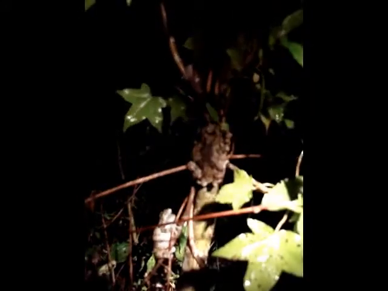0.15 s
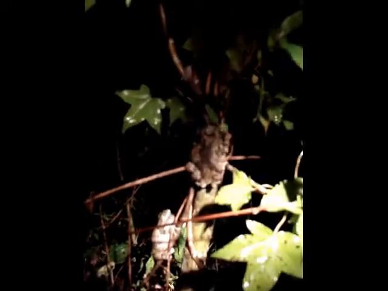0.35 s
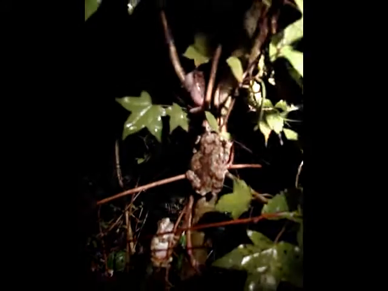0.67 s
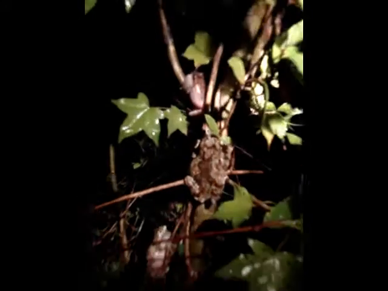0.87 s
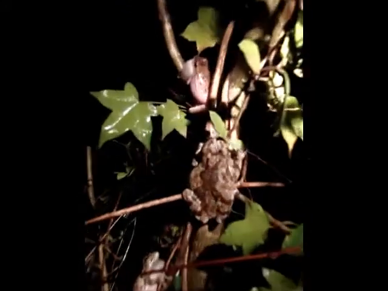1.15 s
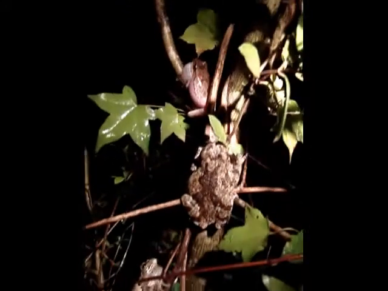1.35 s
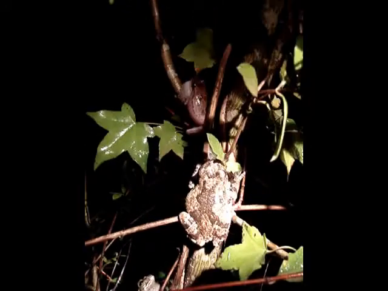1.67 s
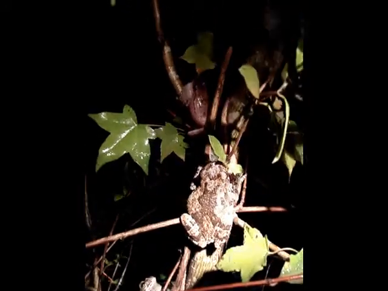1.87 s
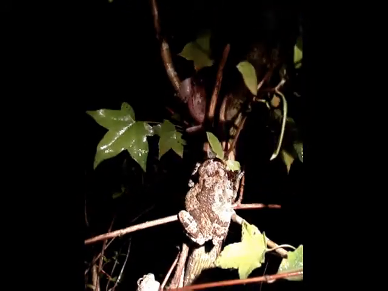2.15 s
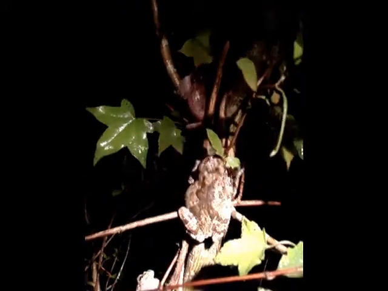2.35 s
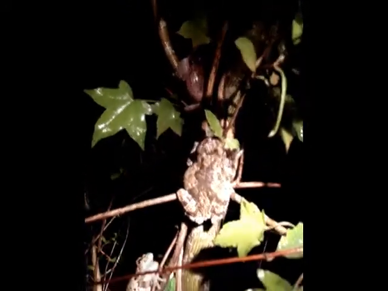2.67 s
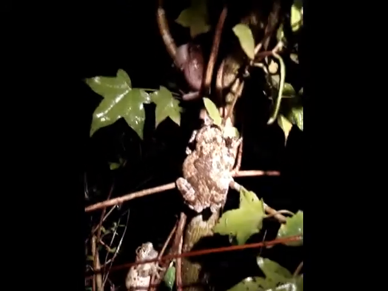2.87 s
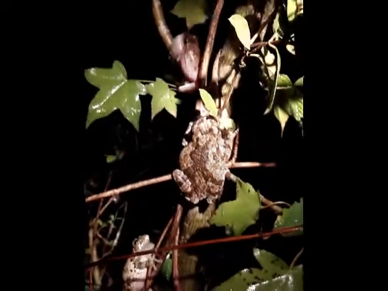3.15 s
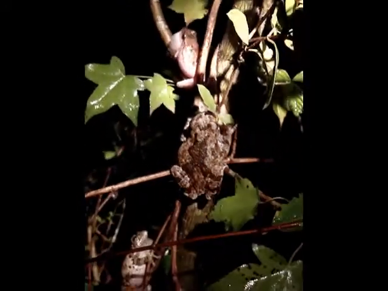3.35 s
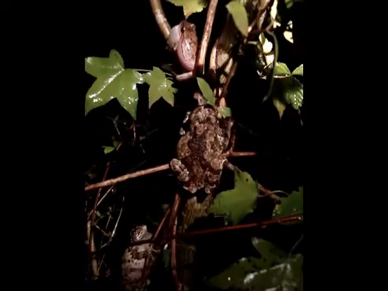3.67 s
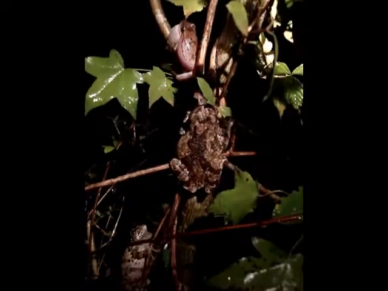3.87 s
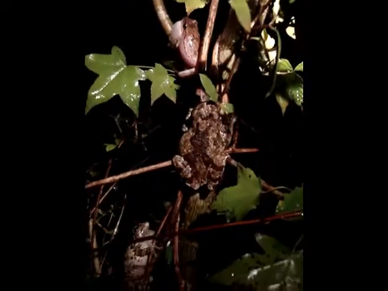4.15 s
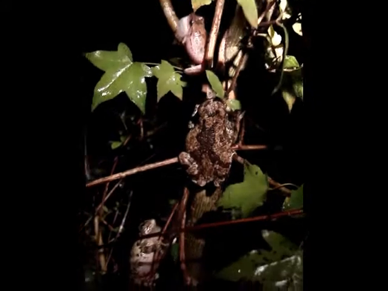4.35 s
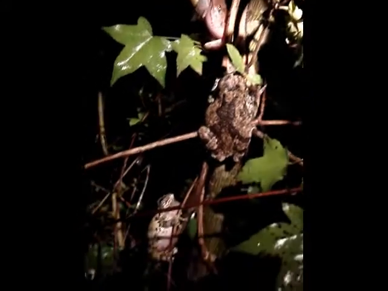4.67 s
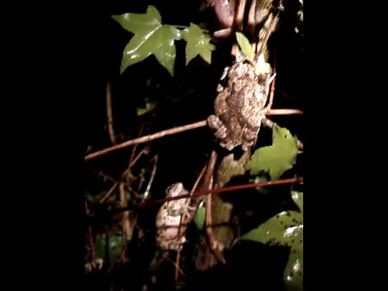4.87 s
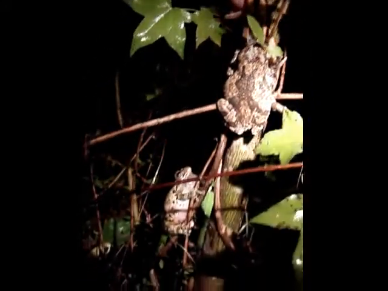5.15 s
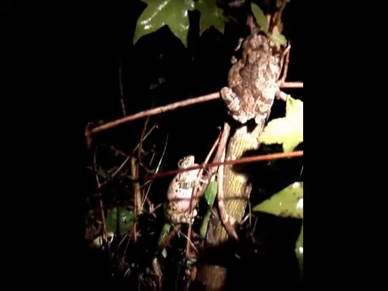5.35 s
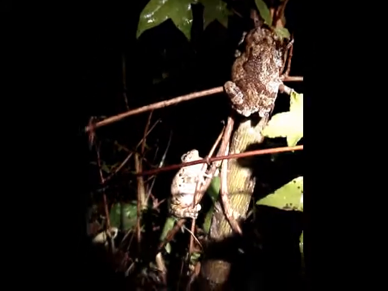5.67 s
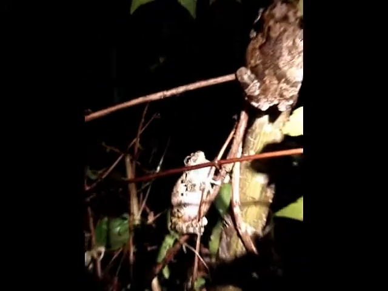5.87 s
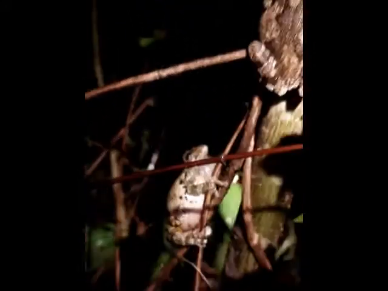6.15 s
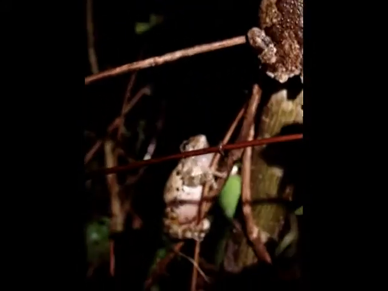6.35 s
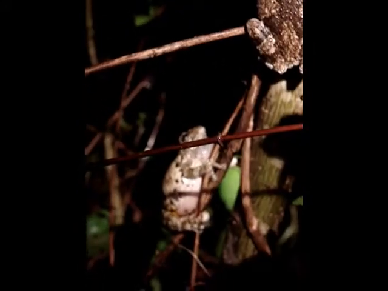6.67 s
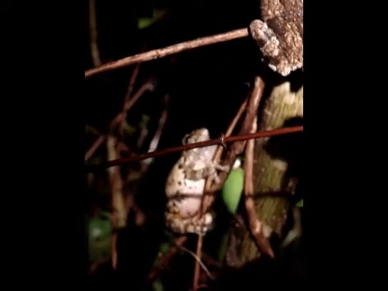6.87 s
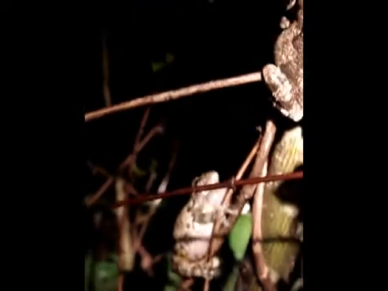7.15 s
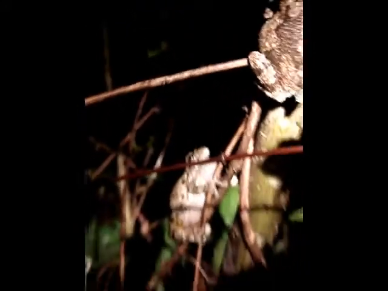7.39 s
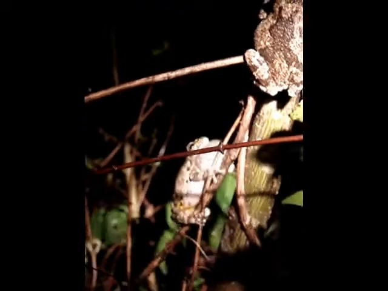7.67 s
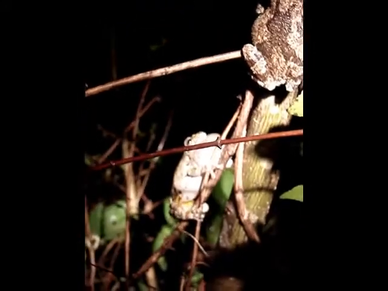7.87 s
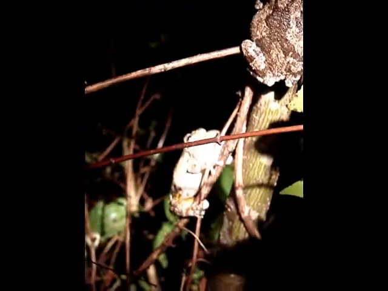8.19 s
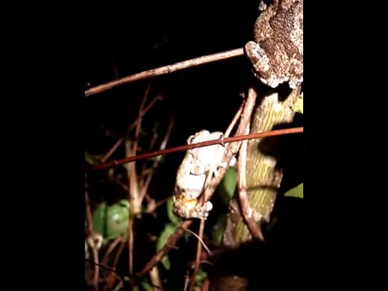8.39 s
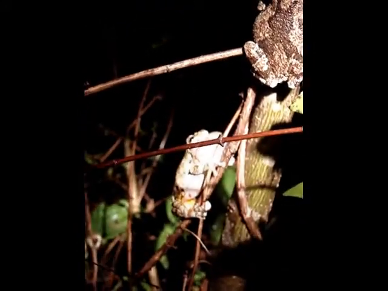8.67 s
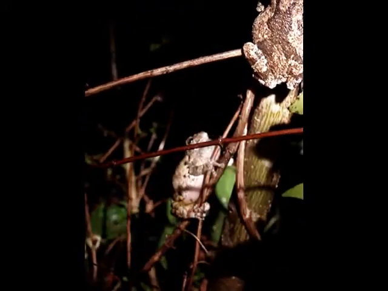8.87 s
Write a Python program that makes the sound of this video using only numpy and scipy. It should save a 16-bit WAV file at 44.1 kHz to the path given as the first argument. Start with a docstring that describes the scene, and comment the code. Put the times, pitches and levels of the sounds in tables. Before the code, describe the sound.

At a night pond edge, two treefrogs very close by trade fast bursts of four or five hard clicks, about six bursts a second each, with a softer, lower third frog between. Another species adds buzzy one-second trills, strongest near one to two seconds and again near eight, when the clicking thins. Behind lie a blurred frog chorus and thin insect shimmer. A small microphone, thin in bass, crunches on the peaks.

```python
"""Quick click bursts from treefrogs ring out first: two close and one softer, by turns and overlapping.
Frogs of a second kind lay long buzzy trills over them, made of pulses that each sweep upward in pitch.
Clicks are short, fading sets of harmonics; trill pulses are harmonic tones that swell and stop.
Behind this pond edge at night are a far chorus of both kinds, a soft low caller, insects made of
chopped noise and a steady noise blur. A small microphone overloads on the peaks."""
import sys
import numpy as np
from scipy import signal
from scipy.fft import rfft, irfft
from scipy.io import wavfile
from scipy.ndimage import uniform_filter1d, minimum_filter1d

SR = 44100
rng = np.random.default_rng(int(sys.argv[2]) if len(sys.argv) > 2 else 0)


def wrap_up_sound(samples):
    """Save the sound to the file named by the first command line argument, as 16-bit audio."""
    columns = np.atleast_2d(samples).T
    # keep every value between -1 and 1, then stretch to whole-number steps
    tamed = np.clip(columns, -1, 1)
    steps = np.round(tamed * 32767).astype(np.int16)
    wavfile.write(sys.argv[1], SR, steps)


N = 397782

# Click bursts: start_s, clicks (count), middle_click_level_db, frog (name)
CLICK_BURSTS = [(.0065, 3, -22, "low"), (.0707, 4, -4, "near"), (.1909, 4, -22, "low"),
                (.2618, 4, -10, "reply"), (.3164, 5, -6, "near"), (.3821, 4, -23, "low"),
                (.3914, 4, -13, "reply"), (.4726, 4, -7, "near"), (.5022, 4, -25, "low"),
                (.5714, 4, -9.5, "reply"), (.6123, 4, -25, "low"), (.6559, 5, -6.5, "near"),
                (.709, 2, -11, "reply"), (.7131, 4, -22, "low"), (.8047, 4, -8, "near"),
                (.8875, 4, -13, "reply"), (.9571, 4, -26, "low"), (.9634, 5, -7.5, "near"),
                (1.0475, 3, -12.5, "reply"), (1.1287, 5, -8.5, "near"), (1.2288, 3, -13, "reply"),
                (1.2917, 4, -30, "low"), (1.2965, 5, -10.5, "near"), (1.402, 3, -17, "reply"),
                (1.4879, 4, -9.5, "near"), (1.5675, 3, -16, "reply"), (1.679, 4, -9, "near"),
                (1.7579, 4, -16, "reply"), (1.8372, 5, -9, "near"), (1.9304, 3, -17, "reply"),
                (2.0165, 5, -9.5, "near"), (2.069, 3, -31, "low"), (2.113, 4, -16, "reply"),
                (2.1945, 4, -7, "near"), (2.2776, 4, -14, "reply"), (2.3025, 4, -30, "low"),
                (2.3581, 5, -7, "near"), (2.4665, 3, -29, "low"), (2.5129, 4, -5.4, "near"),
                (2.5669, 3, -21, "low"), (2.6205, 4, -6, "near"), (2.6886, 4, -27, "low"),
                (2.7615, 5, -6, "near"), (2.8646, 4, -5, "near"), (2.9575, 5, -6.5, "near"),
                (3.0566, 5, -6, "near"), (3.1583, 5, -5, "near"), (3.2463, 4, -23, "low"),
                (3.2545, 4, -14.5, "reply"), (3.3303, 5, -5, "near"), (3.4271, 4, -14, "reply"),
                (3.4529, 4, -26, "low"), (3.5054, 5, -6, "near"), (3.6111, 4, -12.5, "reply"),
                (3.6254, 4, -25, "low"), (3.6807, 5, -6, "near"), (3.7936, 4, -21, "low"),
                (3.8045, 3, -12, "reply"), (3.836, 5, -5.5, "near"), (3.8971, 3, -13, "reply"),
                (3.9163, 4, -28, "low"), (3.9737, 5, -6.5, "near"), (4.0732, 4, -12.5, "reply"),
                (4.0897, 4, -23, "low"), (4.1531, 5, -6, "near"), (4.2453, 4, -15, "reply"),
                (4.2792, 4, -29, "low"), (4.3308, 5, -5, "near"), (4.4088, 4, -22, "low"),
                (4.4133, 4, -13, "reply"), (4.4859, 5, -5, "near"), (4.5609, 4, -26, "low"),
                (4.5944, 3, -10.5, "reply"), (4.6673, 5, -6, "near"), (4.7619, 4, -12.5, "reply"),
                (4.8254, 4, -26, "low"), (4.844, 5, -7.5, "near"), (4.9035, 4, -11.5, "reply"),
                (5.0279, 4, -7, "near"), (5.105, 3, -9.5, "reply"), (5.1734, 5, -4.5, "near"),
                (5.2263, 4, -30, "low"), (5.2666, 4, -11.5, "reply"), (5.3456, 5, -6.5, "near"),
                (5.3973, 4, -30, "low"), (5.4405, 4, -11.5, "reply"), (5.5192, 5, -5.5, "near"),
                (5.6052, 4, -14, "reply"), (5.6839, 5, -6, "near"), (5.7684, 4, -14, "reply"),
                (5.7858, 4, -29, "low"), (5.8505, 5, -6, "near"), (5.936, 4, -13, "reply"),
                (5.9399, 4, -26, "low"), (6.0179, 5, -6, "near"), (6.1105, 4, -12.5, "reply"),
                (6.1224, 4, -22, "low"), (6.199, 5, -6, "near"), (6.2228, 4, -33, "low"),
                (6.272, 4, -11, "reply"), (6.3282, 4, -25, "low"), (6.3876, 5, -7, "near"),
                (6.4563, 4, -24, "low"), (6.5349, 4, -13, "reply"), (6.5741, 4, -22, "low"),
                (6.6165, 5, -6, "near"), (6.6742, 3, -11, "reply"), (6.7038, 4, -26, "low"),
                (6.7457, 5, -6.5, "near"), (6.8215, 4, -10.5, "reply"), (6.9, 5, -7.5, "near"),
                (6.9846, 4, -12, "reply"), (7.0637, 5, -6.5, "near"), (7.1187, 4, -28, "low"),
                (7.149, 4, -13, "reply"), (7.2281, 5, -6.5, "near"), (7.3009, 3, -25, "low"),
                (7.3264, 4, -11, "reply"), (7.4086, 4, -6, "near"), (7.4831, 4, -27, "low"),
                (7.5071, 3, -9.5, "reply"), (7.5859, 4, -5, "near"), (7.6656, 4, -12.5, "reply"),
                (7.6815, 4, -25, "low"), (7.7542, 4, -6, "near"), (7.8152, 3, -22, "low"),
                (7.8373, 5, -19, "reply"), (7.931, 4, -10, "near"), (8.0031, 4, -17, "reply"),
                (8.1643, 4, -17, "reply"), (8.2781, 3, -18, "reply"), (8.361, 5, -18.5, "reply"),
                (8.3617, 4, -31, "low"), (8.4727, 5, -12, "near"), (8.5649, 4, -32, "low"),
                (8.5705, 3, -15.5, "reply"), (8.6606, 4, -18.5, "reply"), (8.782, 5, -20, "reply"),
                (8.9296, 4, -17, "reply")]
# The three clicking frogs, by name: pitch_hz, fundamental_db (added to its level in the click harmonics),
# first_click_db, last_click_db (both against the middle clicks)
CLICKING_FROGS = {"near": (1971.5, -3.5, 0, -4.5), "reply": (1962.5, 2, -1.5, -0.5),
                  "low": (1772, 9.5, -5.5, -3.5)}
# Harmonics of a click, from the fundamental up: level_db, fade_60_db_s
CLICK_OVERTONES = [(-2.5, 0.015), (-1.5, 0.011), (-23.5, 0.0098), (-45, 0.034), (-42, 0.05)]
# Looser folds of the vocal sac ring beside the harmonics: pitch_ratio (times the pitch), level_db, fade_60_db_s
LOOSE_FOLDS = [(2.15, -4.5, 0.0075), (1.84, -1.5, 0.0067), (1.09, -7, 0.01)]
# Trills: first_pulse_s, middle_pulse_s, last_pulse_s, pulses (count), early_db, late_db, strongest_hz
TRILL_CALLS = [(.0224, .5214, 1.05, 49, -7, -4.5, 2630), (.0233, .1611, .3012, 13, -8, -10, 2600),
               (.9703, 1.5031, 2.0566, 49, -1, -1.5, 2700), (2.084, 2.5456, 2.9947, 43, -12, -14, 2460),
               (3.0176, 3.4822, 3.9844, 45, -15, -18, 2370), (4.0186, 4.4438, 4.849, 39, -17, -9, 2540),
               (4.2037, 4.7442, 5.3023, 53, -12, -16, 2560), (4.5569, 4.9536, 5.3632, 37, -14, -12, 2570),
               (5.32, 5.7272, 6.1568, 41, -12, -14, 2480), (5.9922, 6.3087, 6.6376, 29, -9, -4, 2610),
               (6.6591, 7.1325, 7.636, 46, -8, -7, 2650), (7.8858, 8.3499, 8.8344, 43, -2, -2.5, 2690),
               (7.6973, 8.2681, 8.8479, 56, -2, -3, 2570), (8.8726, 8.9387, 9.005, 7, -11, -13, 2550)]
# Harmonics of a trill pulse, on multiples of half its strongest pitch: level_db
TRILL_OVERTONES_DB = [-20, -3.5, -25.5, -37.5, -49, -71, -51.5]
# Level at which the far trills are heard, before blurring; it dips at times: time_s, level_db
FAR_TRILL_HEARD = [(0, -15), (.4, -22.5), (1.2, -24.5), (1.9, -20), (2.1, -24), (3.0, -30.5), (3.7, -33),
                   (4.3, -28), (4.9, -19), (5.4, -25.5), (6.1, -25), (6.5, -19), (7.0, -21.5), (7.6, -24.5),
                   (7.8, -37), (8.05, -32), (8.75, -42.5), (9.02, -22.5)]
# Distant low calls, before flutter and blurring: start_s, level_db, pitch_hz
LOW_NOTES = [(3.034, -34.5, 1047), (3.275, -33.5, 1030), (3.5744, -34.5, 1044), (3.9242, -35, 1004),
             (4.0694, -34, 1030), (6.9648, -33.5, 1090), (7.239, -34.5, 1070), (7.5128, -31.5, 1068)]
# Level at which the insect band is heard; it dips at times: time_s, level_db
INSECT_BAND_HEARD = [(0, -44.5), (.6, -49), (1.8, -58.5), (2.4, -49.5), (4.0, -51), (4.7, -51),
                     (7.0, -47.5), (7.8, -57.5), (9.02, -60)]
# Tone colour of the night blur: frequency_hz, relative_level_db (per Hz)
NIGHT_COLOUR = [(700, -39), (1100, -3.5), (1350, -6), (1650, -7.5), (2500, 3.5), (3300, -17), (4000, -20),
                (4900, -28.5), (5800, -17), (9500, -28)]
# Echoes off leaves and water: delay_s, level_db
LEAF_WATER_ECHOES = [(.0045, -19), (.0065, -28), (0.012, -21.5), (0.02, -38)]

# Click bursts
CLICK_GAP_S, GAP_GROWTH_S = 0.0101, 0.00042   # first gap, and how much each later gap grows
CLICK_RISE_S = 0.0012
CLICK_SWEEP_PER_S = 1   # relative pitch rise
BURST_PITCH_SPREAD = 0.012   # relative, from burst to burst
BURST_GLIDE = 0.007   # relative pitch rise per click
FUNDAMENTAL_GAIN_DB = 0.03   # growth per click
STUTTER_PITCH = 1.05   # times the burst's pitch
FOLD_SCATTER_TURNS = 0.12   # how far each fold starts out of step

# Trills
PULSE_RISE_S, PULSE_FALL_S = 0.0023, 0.0019   # widths of the bell-shaped swell
PULSE_SWEEP_PER_S = 24.3   # relative pitch rise
# The vocal sac favours the octave early in the sweep, so the fundamental swells later and for longer.
FUNDAMENTAL_LAG_S, FUNDAMENTAL_STRETCH = 0.0018, 1.755
TRILL_START_DB, TRILL_SWELL_S = -13, 0.03   # a trill begins softer and swells
TRILL_WAVER_DB = 0.85   # slow unevenness within a trill

# Background
FAR_CLICKERS_DB = -38   # before blurring
LOW_CALL_FLUTTER = 0.85
INSECT_HZ, INSECT_WIDTH_HZ, INSECT_CHIRPS_PER_S = 5655, 440, 44
NIGHT_DB = -39.5
SCATTER_DB, SCATTER_T60_S = -10, 0.02

# Microphone
LOW_CUT_HZ, HIGH_CUT_HZ, SELF_NOISE_DB = 850, 10200, -60.5
TONE_DIP_HZ, TONE_DIP_WIDTH_HZ, TONE_DIP_SHARE = 4750, 610, 0.43   # a broad dip in the tone near here
LIMIT, LIMIT_HOLD_S, LIMIT_SENSE_S = 0.63, 0.0013, 0.0026
LOPSIDED, CREST_OVERLOAD, TROUGH_OVERLOAD, HARDNESS = 0.0035, 0.78, 0.97, 6.57


def bursts(rows):
    """Clicks slow down a little through a burst and rise in pitch; from the fourth on they stutter."""
    events = []
    detune = 1 + BURST_PITCH_SPREAD * rng.standard_normal(len(rows))
    for (start_s, count, middle_db, frog), tune in zip(rows, detune):
        pitch_hz, fundamental_db, first_db, last_db = CLICKING_FROGS[frog]
        for k in range(round(count)):
            at = start_s + k * CLICK_GAP_S + k * (k - 1) / 2 * GAP_GROWTH_S
            level_db = middle_db
            if k == 0:
                level_db += first_db
            elif k == round(count) - 1:
                level_db += last_db
            low_db = fundamental_db + FUNDAMENTAL_GAIN_DB * (k - 2)
            events.append((at, level_db, tune * pitch_hz * (1 + BURST_GLIDE * (k - 2)), low_db))
            if k >= 3:
                # the stutter: a softer, higher second click close behind
                late = at + rng.uniform(0.002454, 0.0047)
                events.append((late, level_db - 2.5, STUTTER_PITCH * tune * pitch_hz, low_db))
    at, *columns = np.transpose(events)
    return clicks(at + 0.00015 * rng.standard_normal(len(at)), *columns)


def clicks(at_s, level_db, pitch_hz, fundamental_db):
    """Each snap of the larynx is a short harmonic tone; the octave dies before the fundamental."""
    t = np.arange(900) / SR
    chance = rng.standard_normal((len(at_s), 1 + len(CLICK_OVERTONES)))
    pitch = pitch_hz * (1 + 0.018 * chance[:, 0])
    turns = pitch[:, None] * (t + CLICK_SWEEP_PER_S * t ** 2 / 2)
    tone = 0
    for k, (harmonic_db, t60) in enumerate(CLICK_OVERTONES, 1):
        height_db = level_db + harmonic_db + 0.86 * chance[:, k]
        if k == 1:
            height_db = height_db + fundamental_db
        fading = from_db(height_db[:, None] - 60 * t / t60)
        tone = tone + fading * np.cos(2 * np.pi * k * turns)   # crests line up: a lopsided wave
    for ratio, fold_db, t60 in LOOSE_FOLDS:
        fading = from_db(level_db[:, None] + fold_db - 60 * t / t60)
        offset = 0.5 + FOLD_SCATTER_TURNS * rng.standard_normal((len(at_s), 1))
        tone = tone + fading * np.cos(2 * np.pi * (ratio * turns + offset))
    rise = 1 - np.exp(-(t / CLICK_RISE_S) ** 2)
    return place(at_s, t, 2.6 * tone * rise)


def trills():
    """The gap between pulses changes evenly, growing in most trills; the level swells, then drifts."""
    events = []
    for first, middle, last, count, early_db, late_db, pitch_hz in TRILL_CALLS:
        way = np.linspace(-1, 1, round(count))   # from the first pulse to the last
        bend = (first + last) / 2 - middle
        at = middle + way * (last - first) / 2 + way ** 2 * bend
        waver = 2 * uniform_filter1d(rng.standard_normal(len(way)), size=4)
        level_db = np.interp(at, [first, last], [early_db, late_db])
        level_db = level_db + TRILL_START_DB * np.exp(-(at - first) / TRILL_SWELL_S)
        events.append((at, level_db + TRILL_WAVER_DB * waver, pitch_hz + 0 * at))
    return pulses(*np.concatenate(events, axis=1))


def pulses(at_s, level_db, pitch_hz):
    """One breath pulse of a trill is a harmonic tone that swells, sweeps up and stops."""
    t = np.arange(-450, 450) / SR
    chance = rng.standard_normal((len(at_s), 3))
    fundamental_hz = pitch_hz / 2 * (1 + 0.014 * chance[:, 0])
    turns = fundamental_hz[:, None] * (t + PULSE_SWEEP_PER_S * t ** 2 / 2) + chance[:, 1:2]
    low, *high = [from_db(db) * np.sin(2 * np.pi * k * turns)
                  for k, db in enumerate(TRILL_OVERTONES_DB, 1)]
    tone = low * swell((t - FUNDAMENTAL_LAG_S) / FUNDAMENTAL_STRETCH) + sum(high) * swell(t)
    return place(at_s, t, from_db(level_db + chance[:, 2])[:, None] * tone)


def swell(t):
    """The pulse grows and fades as a bell curve with its own width on each side."""
    return np.exp(-0.5 * (t / np.where(t < 0, PULSE_RISE_S, PULSE_FALL_S)) ** 2)


def far_chorus():
    """Several unseen frogs of each kind call at once; foliage blurs a share of their pulses."""
    period_s = rng.uniform(0.021, 0.024, (6, 1))   # six trilling frogs
    pitch_hz = rng.uniform(2250, 2820, (6, 1))
    at = period_s * (np.arange(440) + rng.random((6, 1)))
    # each caller swells and rests
    effort_db = 4.5 * np.sin(2 * np.pi * (at / 2.31 + rng.random((6, 1))))
    trillers = rms_one(pulses(at.ravel(), effort_db.ravel(), (pitch_hz + 0 * at).ravel()))
    starts = np.arange(0, N / SR, 0.07)
    starts = starts + 0.048 * rng.standard_normal(len(starts))
    clickers = rms_one(bursts([(s, 4, 0, "low") for s in starts]))
    chorus = from_db(over_time(FAR_TRILL_HEARD)) * trillers + from_db(FAR_CLICKERS_DB) * clickers
    return from_db(-4) * chorus + from_db(-4) * scatter(chorus, 0.04)


def low_caller():
    """A distant nasal call is one soft, fluttering note that swells and fades while its pitch rises."""
    at, level_db, pitch_hz = np.transpose(LOW_NOTES)
    t = np.arange(4000) / SR
    flutter = 20 * uniform_filter1d(rng.standard_normal((len(at), len(t))), size=400)
    shape = np.sin(np.pi * t / t[-1]) * (1 + LOW_CALL_FLUTTER * flutter)
    turns = pitch_hz[:, None] * (0.97 * t + 0.6 * t ** 2 / 2)
    call = place(at, t, from_db(level_db)[:, None] * shape * np.sin(2 * np.pi * turns))
    return from_db(-1) * call + from_db(-8.5) * scatter(call, 0.029)


def insects():
    """Scraped wings give a noisy band chopped into fast uneven chirps."""
    unevenness = rms_one(uniform_filter1d(rng.standard_normal(N), 2000))
    turns = np.cumsum(INSECT_CHIRPS_PER_S * (1 + 0.32 * unevenness)) / SR
    chopped = rng.standard_normal(N) * (1 + 0.6 * np.sin(2 * np.pi * turns))
    edges = [INSECT_HZ - INSECT_WIDTH_HZ / 2, INSECT_HZ + INSECT_WIDTH_HZ / 2]
    band = signal.sosfilt(signal.butter(2, edges, "band", fs=SR, output="sos"), chopped)
    return from_db(over_time(INSECT_BAND_HEARD)) * rms_one(band)


def night():
    """The blur of everything further off is steady noise, coloured by frequency."""
    hz = np.maximum(np.arange(N // 2 + 1) * SR / N, 1)
    colour_hz, colour_db = np.transpose(NIGHT_COLOUR)
    colour = from_db(np.interp(np.log(hz), np.log(colour_hz), colour_db))
    return from_db(NIGHT_DB) * rms_one(irfft(rfft(rng.standard_normal(N)) * colour, N))


def scatter(x, t60):
    """Foliage returns a dense, quickly dying tail."""
    t = np.arange(int(t60 * SR)) / SR
    tail = rng.standard_normal(len(t)) * from_db(-60 * t / t60) * np.minimum(t / 0.0092, 1)
    return signal.fftconvolve(x, tail / np.sqrt(np.sum(tail ** 2)))[:N]


def place(at_s, t, grains):
    """Adds short sounds together, one per row, each at its own time; t is their shared time axis."""
    index = np.round((np.asarray(at_s)[:, None] + t) * SR).astype(int)
    inside = (index >= 0) & (index < N)
    return np.bincount(index[inside], grains[inside], N)


def over_time(rows):
    """Draws straight lines between (time, level) points, one value per sample."""
    time_s, level = np.transpose(rows)
    return np.interp(np.arange(N) / SR, time_s, level)


def from_db(db):
    """Turns decibels into an amplitude factor."""
    return 10 ** (np.asarray(db) / 20)


def rms_one(x):
    """Scales a sound to an average (RMS) strength of one."""
    return x / np.sqrt(np.mean(x ** 2) + 1e-20)


def scene():
    """The listed frogs get echoes and a leafy tail; the background layers are added."""
    near = bursts(CLICK_BURSTS) + trills()
    echoes = sum(from_db(db) * np.roll(near, round(s * SR)) for s, db in LEAF_WATER_ECHOES)
    near = near + echoes + from_db(SCATTER_DB) * scatter(near, SCATTER_T60_S)
    return (near + far_chorus() + low_caller() + insects() + night())[None]


def limiter(x):
    """Gain drops where the level over a few milliseconds passes the limit; a short click slips through."""
    level = np.pi / 2 * uniform_filter1d(np.abs(x), size=max(round(LIMIT_SENSE_S * SR), 3))
    size = max(round(LIMIT_HOLD_S * SR), 3)
    wanted = np.minimum(1, LIMIT / (level + 1e-9))
    return x * uniform_filter1d(minimum_filter1d(wanted, size=size), size=size)


def record(dry):
    """A small microphone cuts bass and top, limits, and flattens crests sooner than troughs."""
    x = signal.sosfiltfilt(signal.butter(4, LOW_CUT_HZ, "high", fs=SR, output="sos"), dry)
    dip_band = signal.lfilter(*signal.iirpeak(TONE_DIP_HZ, TONE_DIP_HZ / TONE_DIP_WIDTH_HZ, fs=SR), x)
    x = limiter(x - TONE_DIP_SHARE * dip_band)
    # uneven overload of the lopsided clicks leaves a low thump
    x = x - LOPSIDED * x ** 2
    ceiling = np.where(x > 0, CREST_OVERLOAD, TROUGH_OVERLOAD)
    x = x / (1 + (np.abs(x) / ceiling) ** HARDNESS) ** (1 / HARDNESS)
    hiss = signal.lfilter([1], [1, -0.9], rng.standard_normal(x.shape))
    x = x + from_db(SELF_NOISE_DB) * rms_one(hiss)
    # two steep filters in a row cut the top
    x = signal.sosfilt(signal.cheby2(10, 30, HIGH_CUT_HZ, fs=SR, output="sos"), x)
    return signal.sosfilt(signal.cheby2(12, 60, 1.15 * HIGH_CUT_HZ, fs=SR, output="sos"), x)


dry = scene()
out = record(dry)
wrap_up_sound(out)
```